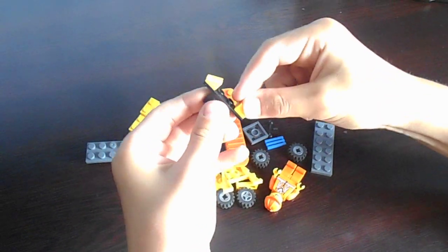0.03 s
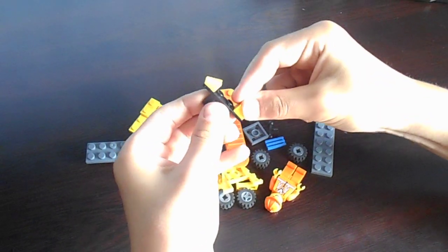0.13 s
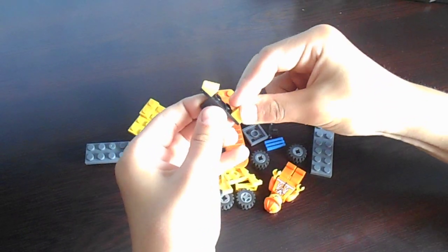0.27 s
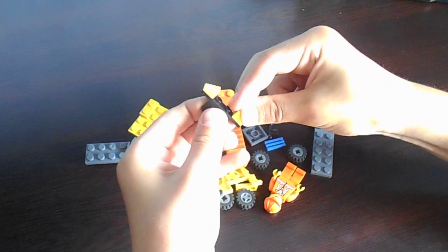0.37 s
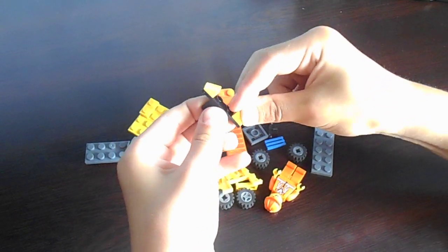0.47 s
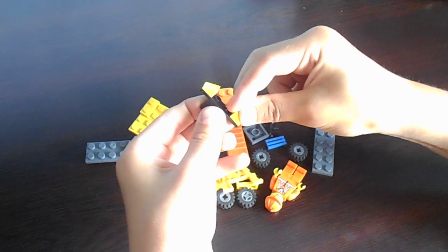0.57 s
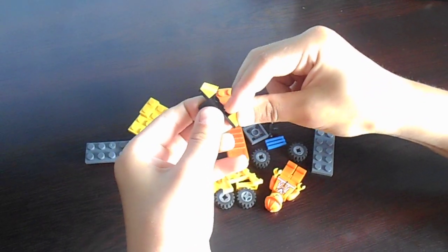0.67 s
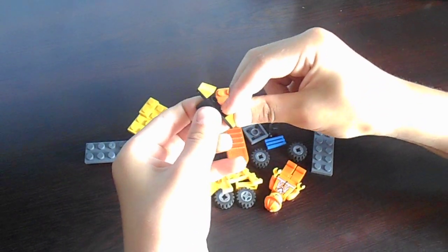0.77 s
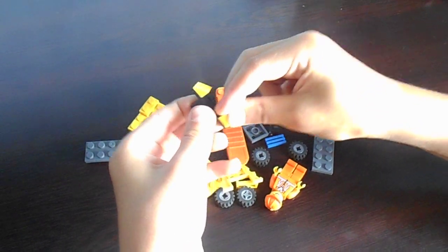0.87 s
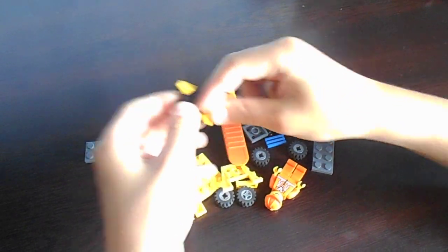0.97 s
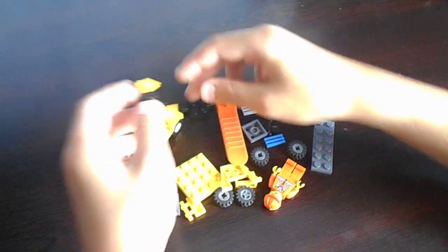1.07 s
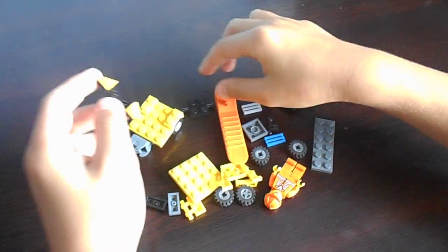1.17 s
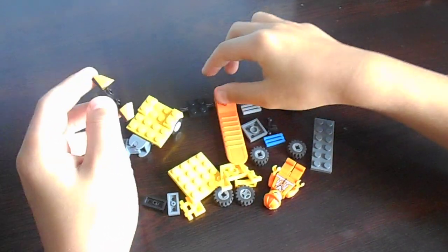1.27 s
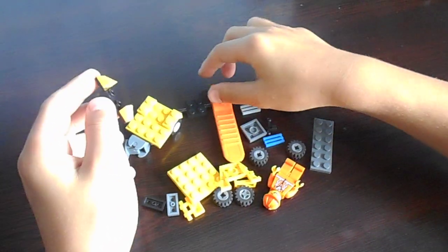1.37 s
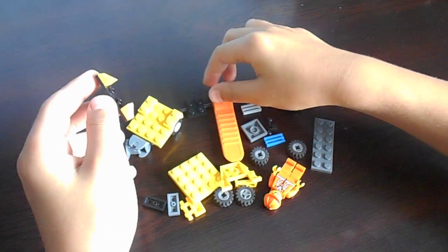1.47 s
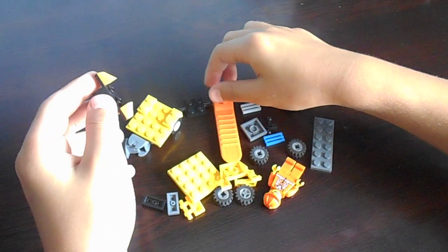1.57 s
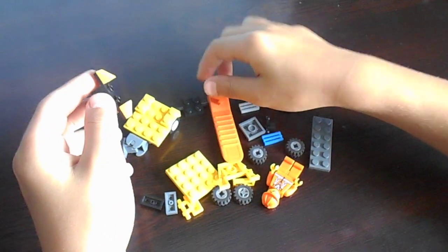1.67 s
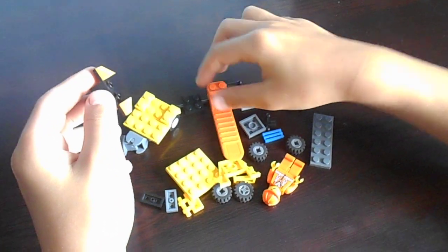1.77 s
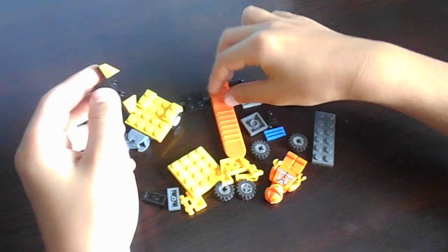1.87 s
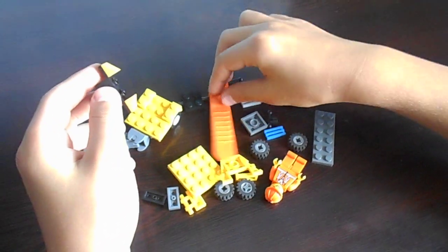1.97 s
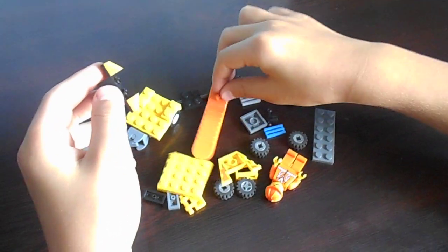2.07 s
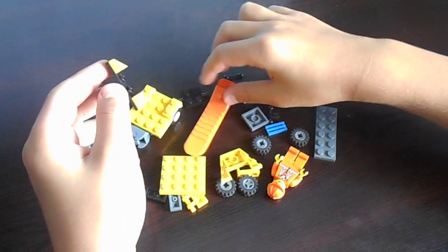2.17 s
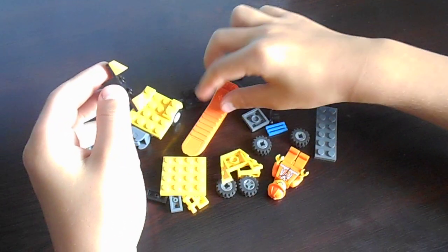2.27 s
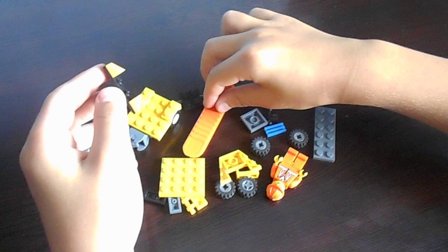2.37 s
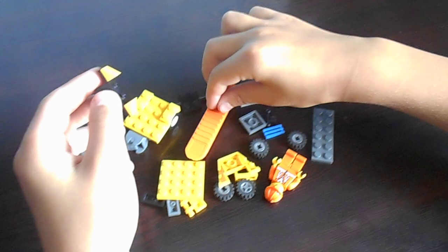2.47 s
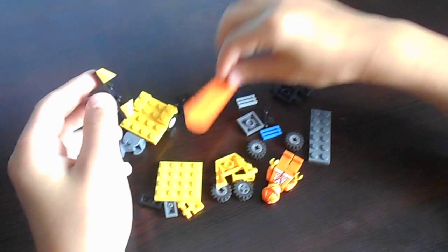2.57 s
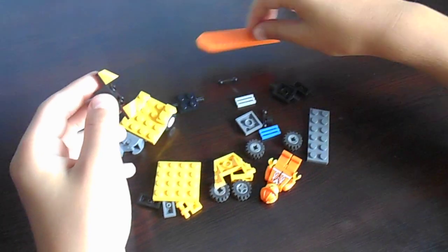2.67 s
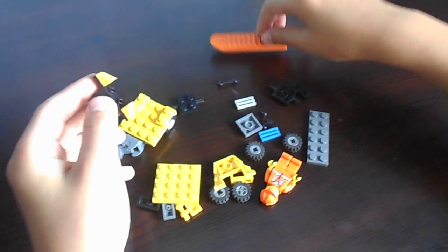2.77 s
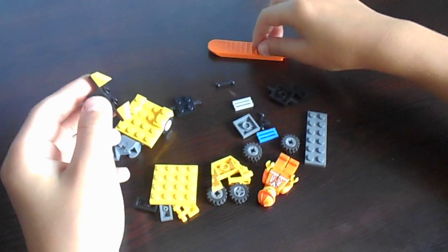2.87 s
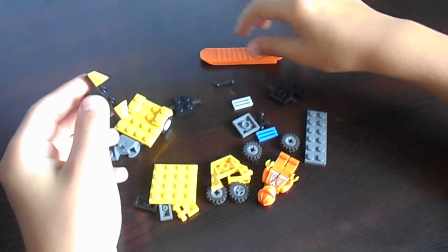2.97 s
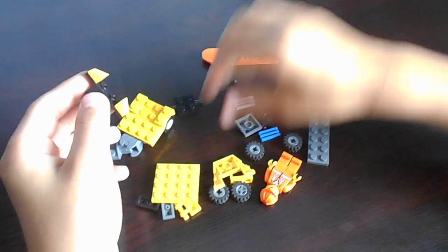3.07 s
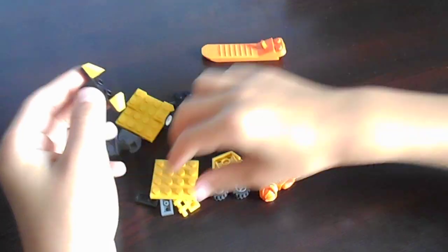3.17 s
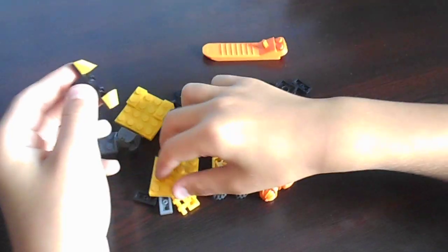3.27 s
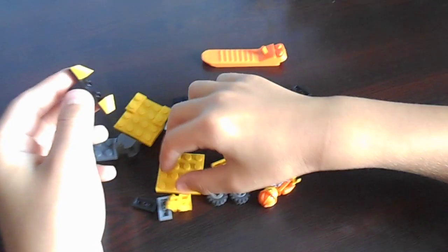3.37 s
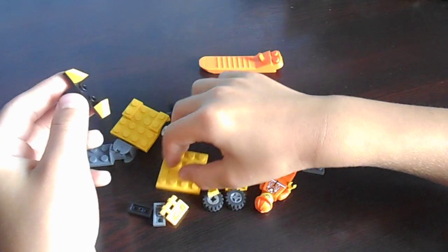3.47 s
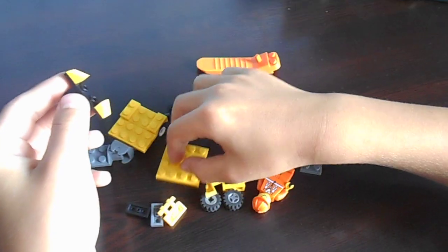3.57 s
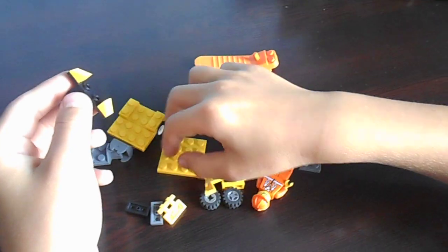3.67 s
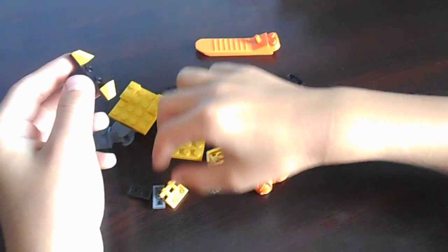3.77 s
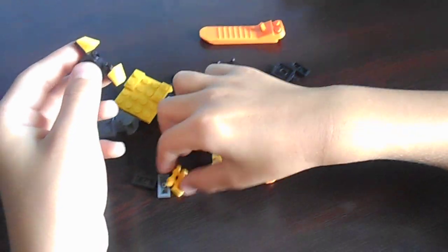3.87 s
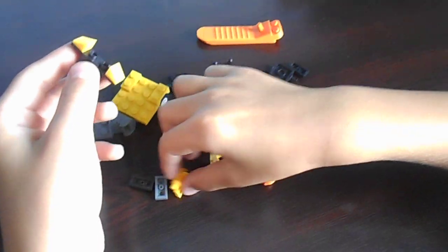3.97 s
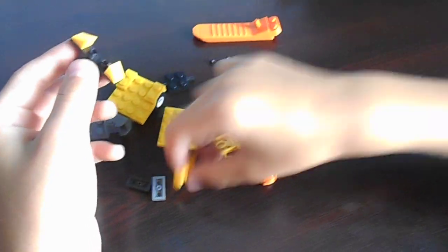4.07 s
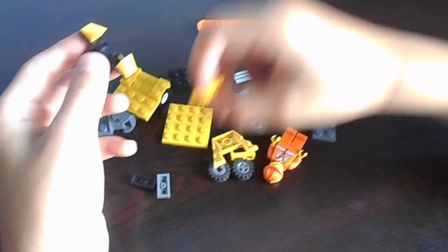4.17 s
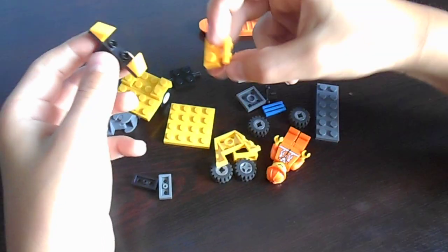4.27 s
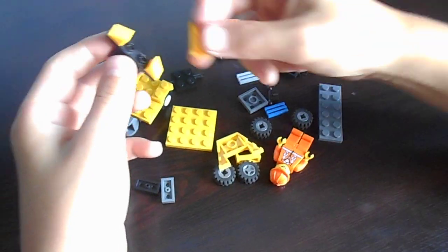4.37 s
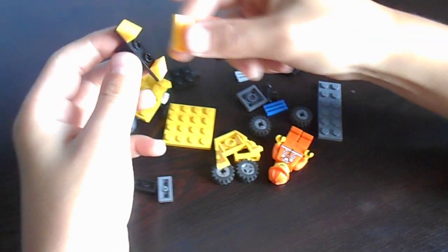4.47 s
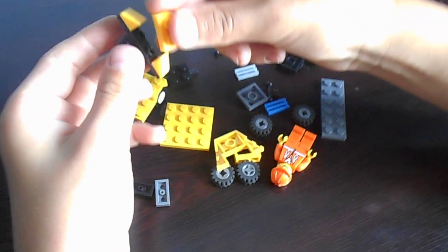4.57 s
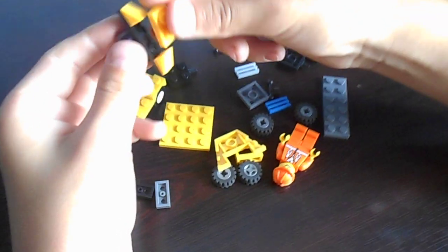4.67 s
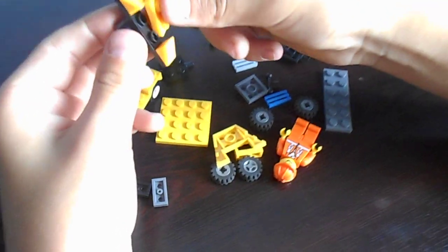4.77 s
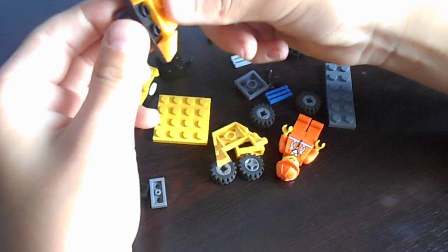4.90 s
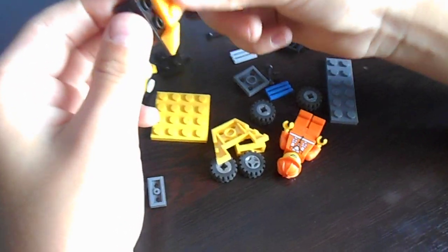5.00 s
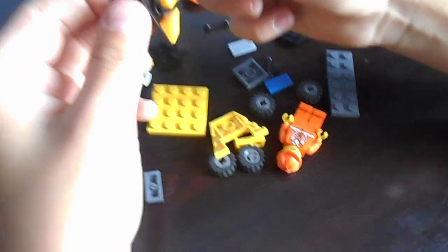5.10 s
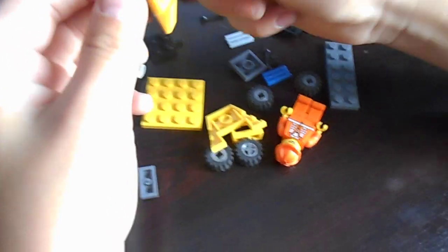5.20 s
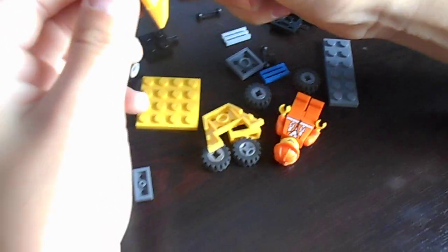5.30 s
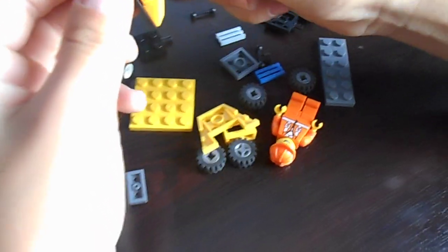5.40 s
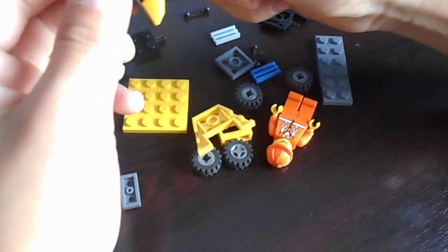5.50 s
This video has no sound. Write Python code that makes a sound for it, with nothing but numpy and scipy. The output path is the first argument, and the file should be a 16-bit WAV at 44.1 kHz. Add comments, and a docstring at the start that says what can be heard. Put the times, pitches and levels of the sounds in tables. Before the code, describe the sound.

Small plastic bricks knock, chatter and rub on a wooden table, then a plastic piece drops with a bright clatter before faint ticking studs.

```python
"""A quiet room with a faint electric hum, a microphone with no top octave, mostly direct sound from a table. A
soft brush comes first, then hands handle a small plastic lever: shell-like knocks, short chatters and rubs,
while a low drone swells once. The lever drops on the wood, bounces and rings in many modes over the low thuds
of the table top. Bricks knock as fingers pick a piece from the pile; last they work it onto a model, with small
bright ticks of studs over faint rubs and scrapes."""
import sys
import numpy as np
from scipy import signal
from scipy.fft import rfft, irfft
from scipy.io import wavfile

SR = 44100
rng = np.random.default_rng(int(sys.argv[2]) if len(sys.argv) > 2 else 0)


def output_pcm(signal):
    """Save a mono or channel-first signal as 16-bit PCM at the path in sys.argv[1].

    Samples are clipped to [-1, 1] before scaling.
    """
    pcm = np.clip(np.atleast_2d(signal).T, -1, 1) * 32767
    wavfile.write(sys.argv[1], SR, np.round(pcm).astype(np.int16))


N = 244314
TIME = np.arange(N) / SR

# Room noise. Each row: frequency in Hz, relative density in dB per Hz.
AIR_SPECTRUM = [(25, -29.5), (40, -10.5), (60, -16.5), (85, -22), (130, -9), (200, -10), (290, -8.5),
                (400, -4), (600, -7), (1100, -3.5), (1600, -8.5), (2600, -13.5), (5000, -19), (8000, -27.5),
                (10300, -37.5)]
AIR_DB = -62.5  # rms
HUM_HZ, HUM_DB = 120.2, -74  # dB rms
# A lower drone that swells once. Each row: peak in seconds, rms level in dB, rise and fall in seconds.
DRONE_SWELLS = [(1.55, -74, 1.6, .5)]
DRONE_HZ = 75.4

# Soft dull brushes over the table.
# Each row: start in seconds, level in dB before the decay, rise in seconds, t60 in seconds,
# starting upper edge in Hz.
BRUSHES = [(0.699, -50.5, 0.011, 1, 2930), (3.63, -63, 0.037, 0.3, 1850)]
# Colour of the brushes. Each row: frequency in Hz, relative density in dB per Hz.
BRUSH_SPECTRUM = [(100, -14), (300, 5), (620, 12.5), (1000, 16), (2200, 18.5), (4000, 10), (9000, 10)]

# Fingers push or drag a piece.
# Each row: peak in seconds, level in dB before the rubbing trim, rise and fall in seconds.
STROKES = [(1.47, -56.5, 0.27, 0.13), (1.66, -63, .12, 0.063), (1.88, -66, .12, 0.28),
           (2.12, -44, 0.22, .12), (2.4, -62, 0.083, 0.073), (2.72, -57, .16, .18),
           (2.978, -41.5, 0.019, .04), (3.37, -55.5, 0.054, 0.37), (3.55, -49, 0.34, 0.093),
           (3.7, -60, 0.18, 0.58), (4.03, -57.5, 0.12, 0.21), (4.39, -59, .3, 0.43),
           (5.02, -64.5, .6, 0.46), (5.39, -58.5, 0.38, 0.43)]
SWELL_RANGE_DB = 21  # a stroke or drone climbs this much over its rise and loses it over its fall
HOLDING_DB = -75  # fingers shifting on the pieces they hold, before the rubbing trim
RUBBING_TRIM_DB = -2
# Colour of sliding plastic. Each row: frequency in Hz, relative density in dB per Hz.
SLIDE_SPECTRUM = [(200, -16), (700, 6.5), (1300, 10.5), (2200, 4), (3400, 6.5), (4500, 2), (6000, 1),
                  (8000, -10.5), (10000, -20)]
# A dragged piece scrapes and sings faintly.
# Each row: start in seconds, length in seconds, level of the sung part in dB before its swell,
# pitch in Hz, width in Hz.
SCRAPES = [(1.004, 0.062, -70.5, 7500, 500), (1.415, 0.048, -40.5, 5700, 500),
           (1.499, .11, -59.5, 2100, 250), (1.607, 0.093, -62.5, 2160, 200), (1.839, 0.12, -63, 2890, 99),
           (2.164, 0.068, -54.5, 2020, 120), (2.363, 0.036, -65, 8550, 700), (2.973, 0.033, -57, 7300, 500),
           (3.335, 0.042, -51, 780, 200), (3.438, 0.011, -34, 1290, 300), (3.45, 0.18, -57.5, 1270, 300),
           (3.616, 0.094, -57, 1400, 347), (4.34, 0.11, -71.5, 8870, 1955),
           (4.861, 0.029, -62.5, 7500, 1095), (5.079, 0.052, -71, 7600, 600),
           (5.25, 0.031, -54.5, 7700, 1200)]

# The table top takes the heavier blows. Each row: start in seconds, gain in dB on the modes below.
TABLE_THUDS = [(2.053, -54), (2.861, -43.5), (2.884, -41.5), (2.988, -47), (3.002, -49), (3.343, -75),
               (4.287, -63), (4.622, -55.5)]
# Modes of the wooden top. Each row: frequency in Hz, relative level in dB, t60 in seconds.
TABLE_MODES = [(211, -16, .3), (300, -6.5, 0.058), (355.4, -7, .1), (397, -5, 0.05), (514.5, -4, 0.13),
               (539.6, 1, .06), (815, 0.5, 0.075)]

# Edges in Hz of the five bands that colour a contact: bass, then around 1, 2, 4 and 7 kHz.
BAND_EDGES_HZ = [150, 820, 1500, 2900, 5500, 9200]
# Studs catching between the fingers.
# Each row: start in seconds, level in dB before the trim, the bands at 1, 2 and 7 kHz
# (each in dB against 4 kHz), t60 in seconds.
STUD_TICKS = [(4.3335, -56, -3, -18, -7, .042), (4.4032, -53.5, -20, -1, -14, .031),
              (4.4699, -53.5, -4.5, -2.5, -3.5, 0.054), (4.62, -46.5, 2.5, -3, -10.5, .054),
              (4.7558, -52.5, -7, -1.5, 8.5, .014), (4.7646, -50.5, 3.5, -4, 15, 0.047),
              (4.8826, -46.5, -23, -17, 12, .0067), (4.8899, -48.5, -8, -6, 8.5, .015),
              (5.0177, -50, 0.5, -3.5, -24, 0.016), (5.0521, -51.5, -2.5, -4, 6, 0.0059),
              (5.0769, -47.5, -2, -3, 16, .011), (5.2026, -56, -2, -11, 9, .043),
              (5.2259, -44, -2, -9, 18, .03), (5.2617, -40.5, -26.5, -8, 7, .018),
              (5.4473, -45.5, -24, -30, 9, 0.016), (5.4901, -53.5, -15, 1.5, -28.5, 0.0055)]
# Resonances of a stud contact. Each row: frequency in Hz, width in Hz, level in dB over the bare click.
STUD_BODY = [(5340, 66, 1.7), (6670, 310, 6.8), (7550, 160, 14.7), (8150, 170, 4.8)]

# The lever lands, is let go and bounces.
# Each row: start in seconds, level in dB, the bands at 1, 2 and 7 kHz (each in dB against 4 kHz),
# t60 in seconds, ringing in dB against the level before its trim, strongest ring in Hz.
LEVER_HITS = [(2.8605, -21.5, -18, -22, -3.5, 0.03, -20, 7570),
              (2.8829, -17, -9, -4, -8, .037, -16.5, 1950), (2.8885, -24, -15, 3, -17, 0.016, -15, 2235),
              (2.9868, -27, -1.5, 4.5, -0.5, 0.019, -12, 8530),
              (3.0006, -27.5, -19, 1.5, -8.5, 0.029, 5, 4355)]
# Resonances of a lever contact. Each row: frequency in Hz, width in Hz, level in dB over the bare click.
LEVER_BODY = [(533, 31, 2.1), (1158, 67, 11), (1890, 110, 11), (1870, 130, 10), (2330, 120, 8.7),
              (3150, 220, 7), (3720, 220, 5.9), (4300, 130, 8.7), (4520, 240, 7.8), (7350, 400, 18),
              (8300, 150, 7)]
# What the lever rings with. Each row: frequency in Hz, relative level in dB, undamped t60 in seconds.
LEVER_MODES = [(980, -9, .14), (1170, -8, .11), (1660, -9, .12), (1745, -8, .13), (1840, -11, .2),
               (1950, -8, .18), (2060, -8, .1), (2235, -5, .12), (2385, -9, .26), (2590, -7, .16),
               (2985, -8, .22), (3200, -6, .1), (3570, -10, .16), (4272, -7, .25), (4315, -4, .1),
               (4370, -5, .13), (4545, -7, .07), (7570, -10, .08), (8530, -11, .2)]

# Plastic pieces knocking on each other and the table: first the handled lever, later loose bricks. # Each row:
# start in seconds, level in dB before the contact trim, the bands at 1, 2 and 7 kHz # (each in dB against 4
# kHz), t60 in seconds, ringing in dB against the level, strongest ring in Hz.
BRICK_KNOCKS = [(1.3939, -46, 9, 16.5, 5.5, .14, -10, 2070), (1.4151, -42, -9, -3, -13, 0.055, 3, 2030),
                (1.4235, -38, -25, -5, -5.5, 0.01, -11, 5950), (1.55, -56, 17, 6, 5, 0.05, -4, 2310),
                (1.7053, -43.5, -24, -2.5, -9, 0.021, 0, 2260),
                (1.9686, -54.5, 4, 11, -7.5, .031, -7, 2310), (2.0527, -20, -21, -14, -8, 0.025, -5, 6900),
                (2.0634, -36, -10, -3, 10, .031, -4.5, 8830),
                (2.0736, -30, -10, -.5, -3.5, 0.085, -6.5, 4450), (2.1369, -44, -14, -15, -7, .05, 5, 6870),
                (2.1911, -50.5, -9, -7, -7, 0.052, 4.5, 2090),
                (2.2153, -51.5, -7, 13, -13, .066, 1.5, 2050), (2.3679, -53, 3, 20, 10, 0.056, -17, 2290),
                (2.4798, -56.5, -4, 10, -5.5, 0.047, 3.5, 6900), (2.4915, -62, -8, 4, -4, 0.042, 8.5, 2950),
                (3.3427, -32.5, -18, -10, -0.5, 0.031, -6.5, 4820),
                (3.4239, -50.5, -12, -14, -12, 0.085, -3, 4950), (3.4396, -32, 1, 6, 0.5, 0.024, -7, 1260),
                (3.9646, -51, -10, -8, -15, 0.074, -5, 4380),
                (3.9719, -49, -13.5, -3.5, -17, 0.065, -1.5, 2050)]
# A pushed piece chatters in a run of touches.
# Each row: start in seconds, first gap in seconds before jitter, loss in dB per touch,
# then the first touch as for a knock, from its level on.
CHATTERS = [(1.4322, .0058, 1, -51, -5, -11, -13, .026, -0.5, 5950),
            (2.0863, .012, 3, -46.5, -7.5, -1, 3, .05, -3, 7000),
            (3.3547, .011, 7.5, -43, -13, 0, -10, 0.04, -8.5, 4950),
            (3.4929, .017, 2.5, -44.5, -8, -10, -1.5, 0.017, -13, 1280)]
TOUCHES = 6
GAP_SHRINK, GAP_JITTER = 0.82, 0.08  # each gap against the one before; its random share
# Resonances of a brick contact. Each row: frequency in Hz, width in Hz, level in dB over the bare click.
BRICK_BODY = [(1210, 200, 1.5), (2010, 520, 7), (2320, 560, 13), (2965, 280, 6), (3430, 200, 2.5),
              (4050, 180, 10), (4500, 220, 12), (5970, 400, 9.5), (7140, 110, 17.5), (7640, 170, 16.5),
              (8640, 120, 14.5)]
# What the bricks ring with. Each row: frequency in Hz, relative level in dB, undamped t60 in seconds.
BRICK_MODES = [(1234, -16.5, 0.12), (1510, -8, 0.072), (2049, -1, 0.0632), (2064, -8.5, 0.055),
               (2270, 2, 0.027), (2614, -3, .07), (2950, -3.5, 0.091), (3400, -5.5, 0.081),
               (3880, -3, 0.069), (4230, 7, 0.03), (4755, -7.5, 0.026), (4900, -3.5, 0.076),
               (6240, -17.5, .06), (6960, -6, 0.062), (6870, -10.5, 0.076), (7650, 0, 0.023),
               (8270, -22, 0.21)]
# share of the ring time that fingers and table leave
BRICK_RING_SHARE, LEVER_RING_SHARE = 0.85, 0.47

ATTACK = SR // 100  # samples over which a blow's level is taken
CUTOFF_HZ = 10300  # upper edge of the microphone


def from_db(db):
    """Decibels to gain."""
    return 10 ** (np.asarray(db) / 20)


def rms_one(x):
    """Scale to unit rms."""
    return x / np.sqrt(np.mean(x ** 2) + 1e-20)


def fade(t, t60):
    """Exponential decay by 60 dB in t60."""
    return np.exp(-np.log(1000) * t / t60)


def lowpass(x, order, hz):
    """Roll off the treble above an edge."""
    return signal.sosfilt(signal.butter(order, hz, fs=SR, output="sos"), x)


def add(out, s, sound):
    """Mix a sound in at time s."""
    i = round(s * SR)
    out[i:i + len(sound)] += sound[:N - i]


def coloured(x, spectrum):
    """Give a noise a spectrum; rms 1."""
    hz, db = np.transpose(spectrum)
    bins = np.fft.rfftfreq(len(x), 1 / SR)
    gain = from_db(np.interp(np.log(bins + 1), np.log(hz), db))
    return rms_one(irfft(rfft(x) * gain, len(x)))


def swells(rows):
    """Gain of swells that rise to a peak and fall away, evenly in dB; they add in power."""
    power = np.zeros(N)
    for s, db, rise, fall in rows:
        drop = np.maximum((s - TIME) / rise, (TIME - s) / fall)
        power += from_db(db - SWELL_RANGE_DB * drop) ** 2
    return np.sqrt(power)


def background():
    """Steady room noise, mains hum and a faint low drone."""
    air = from_db(AIR_DB) * coloured(rng.standard_normal(N), AIR_SPECTRUM)
    hum = from_db(HUM_DB) * np.sin(2 * np.pi * HUM_HZ * TIME)
    drone = swells(DRONE_SWELLS) * np.sin(2 * np.pi * DRONE_HZ * TIME)
    return air + np.sqrt(2) * (hum + drone)  # rms to peak of a sine


def room(x, t60, wet_db, wall_hz, delay_s):
    """Diffuse reflections of a small room, dulled by its furnishings, behind the direct sound."""
    t = TIME[:SR // 2]
    onset = np.clip(t / delay_s - 1, 0, 1)
    tail = rng.standard_normal(len(t)) * fade(t, t60) * onset
    tail = lowpass(tail / np.linalg.norm(tail), 1, wall_hz)
    return x + from_db(wet_db) * signal.fftconvolve(x, tail)[:N]


def brushes(dulling_s, dull_hz):
    """A soft rush that starts bright and dulls as it dies away."""
    out, t = np.zeros(N), TIME[:SR]
    bright_share = np.exp(-t / dulling_s)
    for s, db, rise, t60, edge_hz in BRUSHES:
        noise = coloured(rng.standard_normal(SR), BRUSH_SPECTRUM)
        bright = rms_one(lowpass(noise, 3, edge_hz))
        dull = rms_one(lowpass(noise, 3, dull_hz))
        rush = np.sqrt(bright_share) * bright + np.sqrt(1 - bright_share) * dull
        add(out, s, from_db(db) * np.minimum(t / rise, 1) * fade(t, t60) * rush)
    return out


def resonate(x, body):
    """The bare sound plus the resonances of a plastic shell."""
    out = x.copy()
    for hz, width, db in body:
        r = np.exp(-np.pi * width / SR)  # pole radius: a wider resonance dies sooner
        poles = [1, -2 * r * np.cos(2 * np.pi * hz / SR), r * r]
        out += from_db(db) * (1 - r * r) / 2 * signal.lfilter([1, 0, -1], poles, x)
    return out


def sliding(slips_per_s, spread_db, smooth_share):
    """Tiny slips of plastic and skin excite the bricks, over a smooth rub."""
    sizes = from_db(spread_db * np.minimum(rng.exponential(1, N), 4))
    happens = rng.random(N) < slips_per_s / SR
    slips = rms_one(happens * sizes * rng.choice([-1, 1], N))
    rub = rms_one(resonate(slips, BRICK_BODY)) + smooth_share * rng.standard_normal(N)
    pressure = np.hypot(swells(STROKES), from_db(HOLDING_DB))
    return pressure * coloured(rub, SLIDE_SPECTRUM)


def scrapes(rough_db):
    """Friction keeps one resonance of a sliding piece sounding, with the rest of its shell behind it."""
    out, t = np.zeros(N), TIME[:SR // 2]
    for s, length, db, hz, width_hz in SCRAPES:
        friction = rng.standard_normal(len(t))
        sung = rms_one(signal.lfilter(*signal.iirpeak(hz, hz / width_hz, fs=SR), friction))
        rough = coloured(resonate(friction, BRICK_BODY), SLIDE_SPECTRUM)
        stroke = np.sin(np.pi * np.minimum(t / length, 1))
        add(out, s, from_db(db) * stroke * (sung + from_db(rough_db) * rough))
    return out


def table_top():
    """The wooden top answers with a few low, damped modes."""
    out, t = np.zeros(N), TIME[:SR // 2]
    thud = np.zeros(len(t))
    for k, (hz, db, t60) in enumerate(TABLE_MODES):
        thud += (-1) ** k * from_db(db) * np.sin(2 * np.pi * hz * t) * fade(t, t60)
    for s, db in TABLE_THUDS:
        add(out, s, from_db(db) * thud)
    return out


def contacts(rows, body, crack_db, crack_t60, table_db, level_db):
    """A sharp crack and a cloud of dense, quickly dying shell modes; where it strikes sets its colour."""
    out, t = np.zeros(N), TIME[:SR // 8]
    bands = [signal.butter(3, edges, "band", fs=SR, output="sos")
             for edges in zip(BAND_EDGES_HZ, BAND_EDGES_HZ[1:])]
    for s, db, knock_db, clack_db, tick_db, t60, *_ in rows:
        envelope = fade(t, t60) + from_db(crack_db) * fade(t, crack_t60)
        clicks = rng.choice([-1., 1.], (len(bands), len(t))) * envelope
        shells = resonate(clicks, body)
        parts = np.array([signal.sosfilt(band, shell) for band, shell in zip(bands, shells)])
        # the bass follows the 1 kHz part of the knock
        shares = from_db([knock_db + table_db, knock_db, clack_db, 0, tick_db])
        hit = (shares / parts[:, :ATTACK].std(axis=1)) @ parts
        add(out, s, from_db(db + level_db) * hit / hit[:ATTACK].std())
    return out


def ringing(rows, modes, ring_share, favour_db, chance_db, level_db):
    """A blow rings every mode by chance, most near the pitch its strike point favours; fingers damp all."""
    out, t = np.zeros(N), TIME[:SR // 3]
    hz, mode_db, t60 = np.transpose(modes)
    tones = np.sin(2 * np.pi * hz[:, None] * t) * fade(t, ring_share * t60[:, None])
    for s, db, *_, ring_db, ring_hz in rows:
        favoured = np.exp(-(np.log(hz / ring_hz) / 0.05) ** 2)  # within about 5 % of the pitch
        chance = chance_db * rng.standard_normal(len(hz))
        strengths = from_db(mode_db + favour_db * favoured + chance)
        ring = (strengths * rng.choice([-1, 1], len(hz))) @ tones
        add(out, s, from_db(db + ring_db + level_db) * ring / ring[:ATTACK].std())
    return out


def stud_ticks():
    """Studs catch between the fingers with small bright contacts and no long ring."""
    return contacts(STUD_TICKS, STUD_BODY, crack_db=-12, crack_t60=0.003, table_db=-14, level_db=-1)


def lever_drop():
    """The lever strikes the table and rings in its own modes, part damped."""
    hits = contacts(LEVER_HITS, LEVER_BODY, crack_db=-9, crack_t60=0.008, table_db=-19, level_db=0)
    return hits + ringing(LEVER_HITS, LEVER_MODES, LEVER_RING_SHARE,
                          favour_db=12, chance_db=1.5, level_db=-2)


def chatter():
    """Knocks of the rocking pieces: touches weaken evenly in dB and, but for jitter, come ever closer."""
    knocks = []
    for s, gap, loss_db, db, *colour in CHATTERS:
        for k, chance in enumerate(rng.standard_normal(TOUCHES)):
            knocks.append((s, db - k * loss_db, *colour))
            s += gap * GAP_SHRINK ** k * (1 + GAP_JITTER * chance)
    return knocks


def bricks():
    """Pieces knock and chatter: each contact excites the plastic shell and its ringing modes."""
    knocks = BRICK_KNOCKS + chatter()
    hits = contacts(knocks, BRICK_BODY, crack_db=-14, crack_t60=0.006, table_db=-19, level_db=-0.5)
    return hits + ringing(knocks, BRICK_MODES, BRICK_RING_SHARE, favour_db=11, chance_db=2, level_db=0)


def scene():
    """All handling sounds in the room, over the background."""
    rubbing = from_db(RUBBING_TRIM_DB) * sliding(slips_per_s=900, spread_db=0.5, smooth_share=1.0)
    rubbing += scrapes(rough_db=-25.5) + brushes(dulling_s=0.16, dull_hz=870)
    handling = rubbing + table_top() + stud_ticks() + lever_drop() + bricks()
    in_room = room(handling, t60=0.29, wet_db=-12.5, wall_hz=5060, delay_s=0.0034)
    return (background() + in_room)[None]


def record(dry):
    """A small microphone with no top octave: a steep low-pass."""
    return signal.sosfilt(signal.ellip(8, 0.3, 70, CUTOFF_HZ, fs=SR, output="sos"), dry)


dry = scene()
out = record(dry)
output_pcm(out)
```